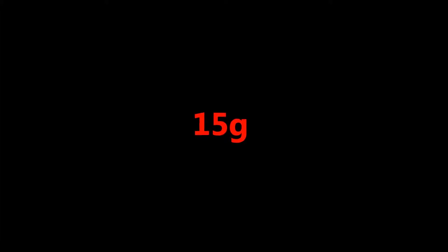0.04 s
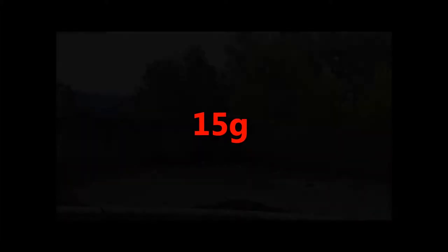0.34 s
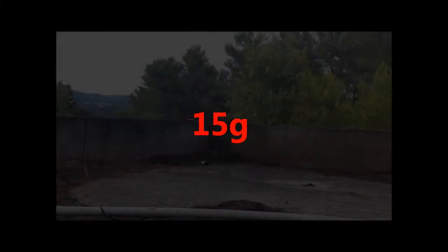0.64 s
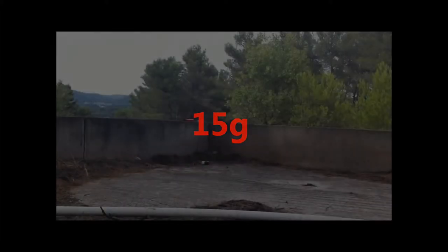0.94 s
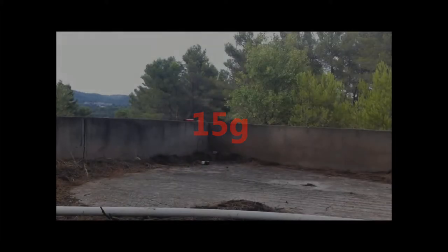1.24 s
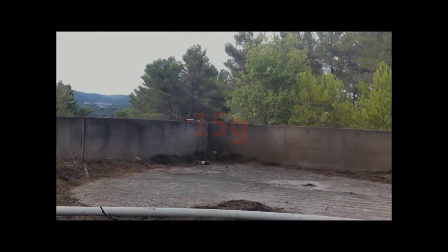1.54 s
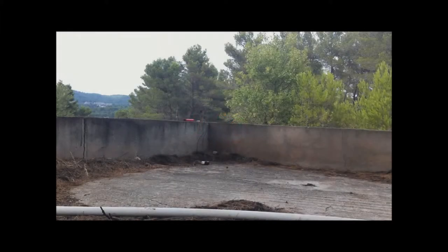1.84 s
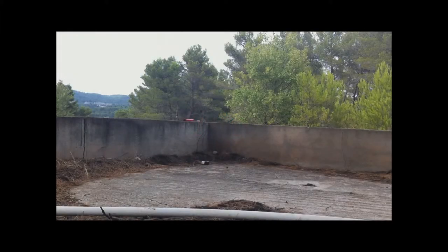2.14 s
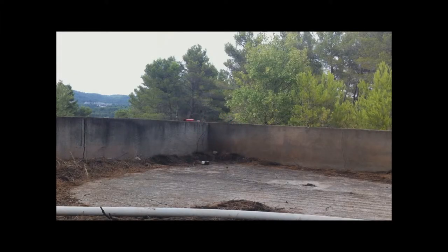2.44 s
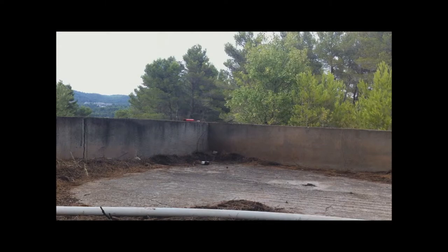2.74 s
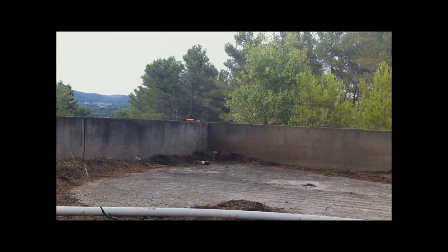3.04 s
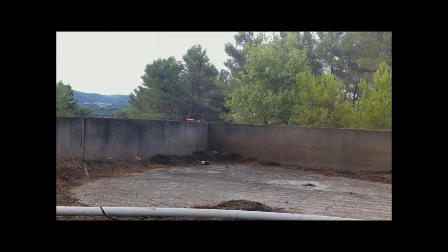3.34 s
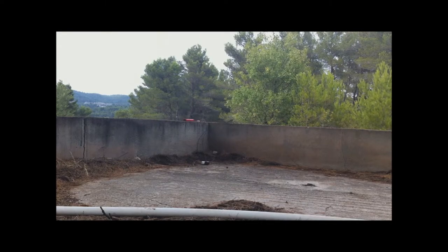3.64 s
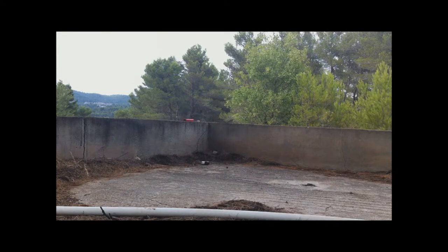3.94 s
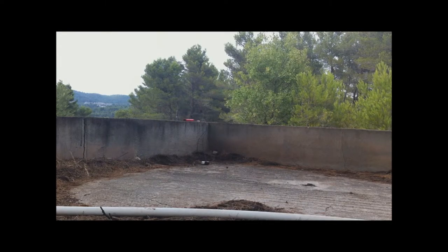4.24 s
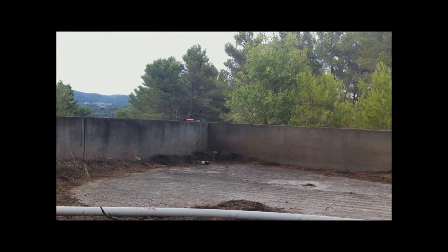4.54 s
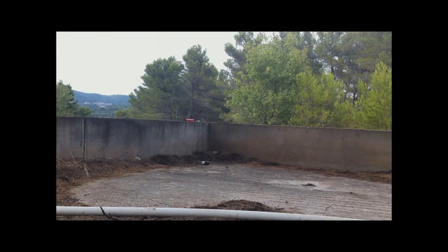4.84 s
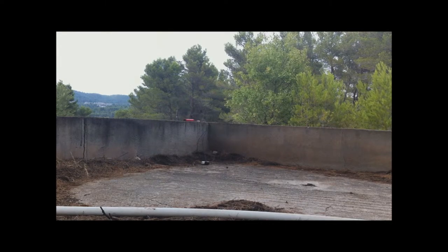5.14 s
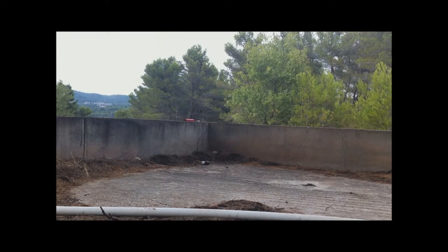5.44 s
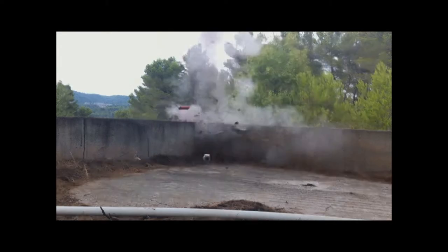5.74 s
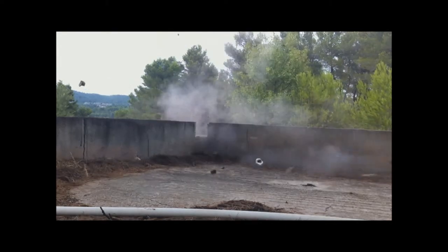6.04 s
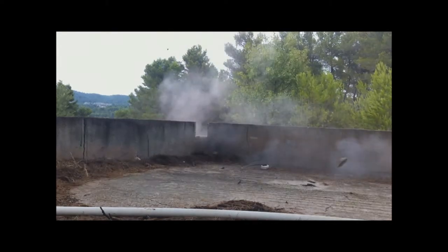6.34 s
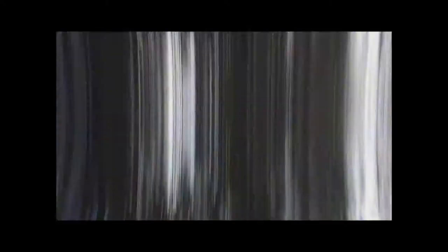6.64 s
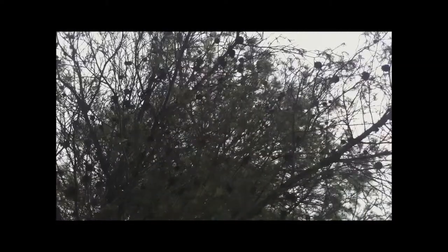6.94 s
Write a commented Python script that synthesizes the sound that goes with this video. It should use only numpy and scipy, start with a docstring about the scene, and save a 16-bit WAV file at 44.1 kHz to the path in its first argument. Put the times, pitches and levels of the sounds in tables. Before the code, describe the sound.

A loud black powder blast in a concrete pit cuts through steady cicadas, then fragments thud down nearby and grit patters.

```python
"""Cicadas sing in the pines round a concrete pit, their clicking tymbals ringing in their bodies.
A small canister of black powder bulges and bursts in the pit, and its shocks overload the microphone.
The walls throw back deep booms, then the roar dies away among the trees.
Flying debris cracks and thuds close by, and one hard fragment rings on the concrete.
Last, grit patters down and the camera is moved with a soft rustle."""
import sys
import numpy as np
from scipy import signal
from scipy.fft import rfft, irfft, next_fast_len
from scipy.io import wavfile

SR = 44100
rng = np.random.default_rng(int(sys.argv[2]) if len(sys.argv) > 2 else 0)


def inscribe(sig):
    """Save sig as 16-bit PCM at rate SR to the path in sys.argv[1].

    A 1-D sig is mono; a 2-D sig holds one channel per row.
    Samples are clipped to [-1, 1] before scaling.
    """
    pcm = np.round(np.clip(np.atleast_2d(sig).T, -1, 1) * 32767)
    wavfile.write(sys.argv[1], SR, pcm.astype(np.int16))


N = 308259

# The shock fronts. Each row: start in seconds, level in dB, decay time in seconds.
SHOCK_FRONTS = [(5.1873, -2, 0.0049), (5.191, 3.5, 0.00012), (5.2039, 0, 0.000077), (5.2375, -0.5, 0.0048),
                (5.2431, -15, .00005), (5.253, -17, 0.0001), (5.2736, -8.5, 0.00067), (5.3607, -1.5, .0002),
                (5.3637, -6, 0.00037), (5.3704, -2, 0.00023)]
# The body of the roar. Each row: frequency in Hz, relative level in dB.
ROAR_BODY = [(30, -36), (60, -28), (88, -24), (106, -6.5), (160, 0.5), (230, -2.5), (300, -6), (400, -5),
             (580, -4.5), (900, -8.5), (1250, -14.5), (1800, -47)]
# The hiss of the roar. Each row: frequency in Hz, relative level in dB.
ROAR_HISS = [(600, -25), (1000, -10), (1400, 0.5), (1900, -2), (2600, -4), (4000, -7), (6000, -9),
             (8000, -11.5), (10500, -13.5), (14500, -20.5), (16000, -36)]
# Low resonances that drone on. Each row: pitch in Hz, relative level in dB.
DRONE_TONES = [(108, -59), (157, -54.5), (203, -58), (239, -60)]
# Booms off the walls. Each row: centre in seconds, level in dB, pitch in Hz.
WALL_BOOMS = [(5.27, -12.5, 171), (5.284, -13, 161), (5.309, -9.5, 190), (5.3625, -12.5, 262)]
# Debris landing close by. Each row: start in seconds, thud level in dB, pitch in Hz,
# rise time in seconds, crack level in dB.
DEBRIS_HITS = [(5.912, -4, 560, 0.00096, 0), (5.9132, -14.5, 168, 0.0029, -28),
               (5.962, -39, 370, .012, -56), (6.1947, -17, 480, 0.0015, -29),
               (6.2057, -2, 1027, 0.001, 1.5), (6.2071, 2.5, 432, 0.0019, -11),
               (6.2706, -0.5, 545, 0.0011, -16.5), (6.2795, -0.5, 377, 0.001, -14.5),
               (6.293, -6, 570, 0.00089, -26), (6.311, -3.5, 360, 0.00096, -21.5),
               (6.3155, -18, 330, 0.005, -40), (6.329, -19.5, 284, 0.005, -42),
               (6.449, -46, 600, .002, -42), (6.626, -32, 241, 0.005, -43), (6.909, -45, 700, .002, -36)]
# The larger chips. Each row: start in seconds, level in dB, seconds to fall 60 dB.
CHIP_TICKS = [(5.481, -17, 0.014), (5.552, -25, .009), (5.733, -24, 0.016), (5.83, -27, .012),
              (5.9541, -19.5, 0.0042), (6.1463, -30, 0.0097), (6.1564, -28, .004), (6.245, -28, 0.0075),
              (6.3467, -21, 0.018), (6.489, -36, .06), (6.6415, -31, .008), (6.67, -33.5, .012)]
# The ring of a hard fragment. Each row: pitch in Hz, relative level in dB, seconds to fall 60 dB.
FRAGMENT_MODES = [(1760, -25, .036), (2360, -0.5, 0.038), (2450, -3.5, 0.026), (4160, -5, 0.046),
                  (6600, -9, 0.042), (7070, -5, 0.037), (9302, -6, 0.033), (10600, -17, .03)]
# The colour of sifting grit and handling. Each row: frequency in Hz, relative level in dB.
RUSTLE_COLOUR = [(80, -14), (300, 6.5), (700, -6), (1500, -1.5), (3500, -1), (6000, 1), (9500, -2.5),
                 (13000, -10), (16000, -14)]
# Soft handling scrapes. Each row: centre in seconds, rms level at the crest in dB,
# spread in seconds, band centre in Hz, bandwidth in Hz.
HANDLING_SCRAPES = [(6.581, -52, 0.015, 1600, 1500), (6.638, -47.5, 0.011, 980, 1090),
                    (6.68, -49.5, .018, 4000, 8000), (6.926, -41.5, 0.012, 9450, 6000),
                    (6.968, -48, 0.037, 5500, 5000), (6.982, -48.5, 0.019, 1140, 400)]
# A cicada's body resonances. Each row: centre in Hz, bandwidth in Hz, relative level in dB.
CICADA_RESONANCES = [(2350, 610, -2), (2970, 630, -2.5), (4900, 1400, 3), (7040, 1400, -5),
                     (8260, 1360, -0.5), (8930, 640, -4), (11900, 2600, -17.5)]
# The colour of the far cicadas together. Each row: frequency in Hz, relative level in dB.
CHORUS_COLOUR = [(200, -66), (1800, -24), (2300, -12), (3100, -14.5), (3700, -24.5), (4150, 0),
                 (4700, -0.5), (5500, -3), (6300, -8.5), (7500, -13.5), (9300, -20.5), (10200, -28),
                 (15500, -36.5)]
# The colour of open air. Each row: frequency in Hz, relative level in dB.
AIR_COLOUR = [(30, -42), (55, -30), (75, -14), (110, -1.5), (210, -1), (400, -3.5), (750, 1), (1100, -0.5),
              (1600, -6), (3500, -10.5), (12000, -35)]
# The bed chokes at the burst and the first thud. Each row: start in seconds, recovery in seconds.
BED_CHOKES = [(5.167, 0.067), (5.911, 0.04)]

OPEN_S, BLAST_S, ROAR_S = 0.2784, 5.1765, 5.259


def rupture(swing_hz=850, glide_s=0.00916, swing_db=-2, gas_db=-8, gas_peak_s=0.009):
    """The canister bulges with a growing, slowing swing, then tears and lets out a jet of gas."""
    t, out = moment(), np.zeros(N)
    pitch = swing_hz * np.exp(-t / glide_s)
    bulge = np.exp(-np.abs(t - .0052) / .0018)
    swing = bulge * np.sin(2 * np.pi * np.cumsum(pitch) / SR)
    jet = np.exp(np.minimum((t - gas_peak_s) / 0.0026, (gas_peak_s - t) / 0.002))
    gas = jet * rng.standard_normal(len(t))
    add(out, BLAST_S, from_db(swing_db) * swing + from_db(gas_db) * gas)
    return cut(out, 130, "high")


def shocks(mic_hz=165, mic_width_hz=135):
    """Each front is a jump in pressure that sinks back; the microphone's bass cut swings after it."""
    fronts = np.zeros(N)
    for s, db, decay_s in SHOCK_FRONTS:
        add(fronts, s, from_db(db) * np.exp(-moment() / decay_s))
    r = np.exp(-np.pi * mic_width_hz / SR)
    feedback = [1, -2 * r * np.cos(2 * np.pi * mic_hz / SR), r * r]
    swung = signal.lfilter([1, -2, 1], feedback, fronts + 1e-18)
    return cut(swung, 95, "high")


def roar(flicker_db=2.5):
    """Countless echoes from walls and trees: a dark body and a grainy hiss over a low drone."""
    body = noise(ROAR_BODY)
    body *= roar_envelope(pit_db=-23.5, flare_db=-24, tail_db=-23.5, fall_db_per_s=25, rest_db=-58.5)
    hiss = noise(ROAR_HISS, grain_db=3) * from_db(flicker_db * drift(120)) + grit()
    hiss *= roar_envelope(pit_db=-28.5, flare_db=-17, tail_db=-25.5, fall_db_per_s=28.5, rest_db=-70)
    hum = drone() * roar_envelope(pit_db=24, flare_db=15, tail_db=17.5, fall_db_per_s=16, rest_db=-1)
    return cut((body + hiss + hum) * fade_in(ROAR_S, 0.0015), 88, "high", order=4)


def roar_envelope(pit_db, flare_db, tail_db, fall_db_per_s, rest_db):
    """The roar holds in the pit, flares once and trails off in the trees; the parts add in power."""
    pit = from_db(pit_db) * (1 - fade_in(5.385, 0.034))
    flare = from_db(flare_db) * swell(5.368, 0.006)
    duck_db = -12.5 * fade_in(5.912, 0.085)   # the tail ducks from the first thud on
    tail = from_db(tail_db - fall_db_per_s * since(ROAR_S) + duck_db)
    return np.sqrt(pit ** 2 + flare ** 2 + tail ** 2 + from_db(rest_db) ** 2)


def drone(waver_hz=2.52, waver_db=0.5):
    """Low resonances hum on, each wavering in pitch and level."""
    out = np.zeros(N)
    for hz, db in DRONE_TONES:
        turns = np.cumsum(hz + waver_hz * drift(25)) / SR + rng.random()
        out += from_db(db + waver_db * drift(16)) * np.sqrt(2) * np.sin(2 * np.pi * turns)
    return out


def wall_echoes(spread_s=0.0038):
    """The walls throw the boom back in a few deep swells."""
    return sum(from_db(db) * np.sin(2 * np.pi * hz * (since(0) - s)) * swell(s, spread_s)
               for s, db, hz in WALL_BOOMS)


def thuds(bump_db=-14, bump_hz=155, bump_t60=0.034, shudder_db=-6, edge_db=-11):
    """Each lump lands with a sharp crack, a heavy swing or two, then a rough shudder over a deep bump."""
    t, out = moment(), np.zeros(N)
    bump = from_db(bump_db - 60 * t / bump_t60) * np.sin(2 * np.pi * bump_hz * t)
    for s, db, hz, rise_s, crack_db in DEBRIS_HITS + tumble():
        punch = t / rise_s * np.exp((1 - (t / rise_s) ** 2) / 2)
        thud = -np.sin(2 * np.pi * hz * t) * punch
        shudder = from_db(shudder_db) * cut(burst(t60=0.033), 800, "low")
        snap = burst(t60=0.0083)
        crack = 2 * resonate(snap, 2400, width_hz=2200) + from_db(edge_db) * snap
        add(out, s, from_db(db) * (thud + shudder + bump) + from_db(crack_db) * crack)
    return cut(out, 105, "high")


def tumble(from_s=6.224, loudest_s=6.281, to_s=6.302, per_s=120, faint_db=-26, loud_db=-15):
    """Debris tumbles between the hard hits: small, uneven knocks, as rows like those of DEBRIS_HITS."""
    rise_s, crack_db, spread_s, knock_hz = 0.0016, -15, 0.012, 430
    grid = np.arange(from_s, to_s, 1 / per_s)
    late, size, detune = rng.standard_normal((len(grid), 3)).T
    crest = np.exp(-((grid - loudest_s) / spread_s) ** 2 / 2)
    starts = grid + .2 * late / per_s
    levels = faint_db + (loud_db - faint_db) * crest + 1.5 * size
    pitches = knock_hz * np.exp(.2 * detune)
    return [(s, db, hz, rise_s, db + crack_db) for s, db, hz in zip(starts, levels, pitches)]


def chips(clink_s=6.1162, clink_db=-22.5, crack_db=3):
    """Chips land with dry ticks, and one hard fragment rings on the concrete."""
    t, out = moment(), np.zeros(N)
    for s, db, t60 in CHIP_TICKS:
        add(out, s, from_db(db) * burst(t60))
    ring = sum(from_db(db - 60 * t / t60) * np.sin(2 * np.pi * hz * t) for hz, db, t60 in FRAGMENT_MODES)
    crack = from_db(crack_db) * burst(t60=0.032)
    add(out, clink_s, from_db(clink_db) * (ring + crack))
    return cut(cut(out, 900, "high"), 11000, "low", order=1)


def grit(per_s=70, level_db=-2, spread_db=5, t60=0.0045):
    """Sand and splinters crackle down at random, each grain a tiny puff of bright noise."""
    sizes = from_db(spread_db * np.minimum(rng.exponential(1, N), 3))
    hits = (rng.random(N) < per_s / SR) * sizes
    decays = signal.lfilter([1], [1, -from_db(-60 / (t60 * SR))], hits + 1e-18)
    crackle = cut(decays * rng.standard_normal(N), 1500, "high")
    return from_db(level_db) * crackle * fade_in(ROAR_S, 0.4)


def rustle(start_s=6.0, start_db=-59, rise_db_per_s=9, flicker_db=2, sand_db=-4):
    """Fine grit sifts down while the camera is picked up with a growing rustle and a few scrapes."""
    growth = from_db(start_db + rise_db_per_s * since(start_s)) * fade_in(start_s, .3)
    handling = noise(RUSTLE_COLOUR, grain_db=3.5) * from_db(flicker_db * drift(70))
    out = growth * (handling + from_db(sand_db) * grit())
    for s, db, spread_s, hz, width_hz in HANDLING_SCRAPES:
        scrape = rms_one(resonate(rng.standard_normal(N), hz, width_hz))
        out += from_db(db) * swell(s, spread_s) * scrape
    return out


def near_cicada(tymbal_hz=84.6, song_db=-50, rest_db=-12, vary_db=0.8, second_tymbal_db=-3):
    """Two tymbals buckle in turn; their click bursts ring in the body, phrase after phrase."""
    singing = phrasing(per_s=4.92, peak_s=0.078, edge=3.7, unsteady_s=0.0034)
    effort = (singing + from_db(rest_db) * (1 - singing)) * from_db(vary_db * drift(3.99))
    strokes = np.cumsum(2 * tymbal_hz * (1 + .02 * drift(15))) / SR
    clicks = np.exp(-3.6 * (strokes % 1)) * from_db(second_tymbal_db * (np.floor(strokes) % 2))
    drive = clicks + 0.28   # the trees smear the clicks
    song = np.zeros(N)
    for hz, width_hz, db in CICADA_RESONANCES:
        rasp = drive * rng.standard_normal(N)
        song += from_db(db) * resonate(resonate(rasp, hz, width_hz), hz, width_hz)
    return from_db(song_db) * effort * rms_one(song)


def far_cicadas(chorus_db=-50.3, phrase_db=4, vary_db=0.6, flutter_db=0.5):
    """A chorus in the pines; one slower singer stands out, in and out of step with the near cicada."""
    singing = phrasing(per_s=4.29, peak_s=0.2, edge=1.1, unsteady_s=.004)
    chorus = noise(CHORUS_COLOUR)
    level_db = chorus_db + phrase_db * singing + vary_db * drift(14) + flutter_db * drift(160)
    return chorus * from_db(level_db)


def phrasing(per_s, peak_s, edge, unsteady_s):
    """An insect's beat, 1 in a phrase and 0 at rest; a high edge makes it square."""
    beat = np.cos(2 * np.pi * per_s * (since(0) - peak_s + unsteady_s * drift(3)))
    return (1 + np.tanh(edge * beat) / np.tanh(edge)) / 2


def countryside(air_db=-61, far_hush_db=-9, near_hush_db=-16):
    """Cicadas over still air; they sit lower in the mix after the bang."""
    after = fade_in(BLAST_S, .02)
    far = far_cicadas() * from_db(far_hush_db * after)
    near = near_cicada() * from_db(near_hush_db * after)
    return far + near + from_db(air_db) * noise(AIR_COLOUR)


def choke(depth_db=-43, attack_s=0.0046, linger=1.4):
    """A gain that drops fast at each choke, lingers and climbs back."""
    dip = sum(fade_in(s, attack_s) * (1 - fade_in(s, recovery_s) ** linger)
              for s, recovery_s in BED_CHOKES)
    return from_db(depth_db * dip)


def from_db(db):
    """Decibels to gain."""
    return 10 ** (np.asarray(db) / 20)


def rms_one(x):
    """Scale to unit power."""
    return x / np.sqrt(np.mean(x ** 2) + 1e-20)


def since(s):
    """Seconds since s, zero before it."""
    return np.maximum(np.arange(N) / SR - s, 0)


def moment():
    """Time axis of a short event."""
    return np.arange(SR // 8) / SR


def fade_in(s, length_s):
    """A straight rise from 0 to 1."""
    return np.minimum(since(s) / length_s, 1)


def swell(s, spread_s):
    """A bell-shaped rise and fall round time s."""
    return np.exp(-((since(0) - s) / spread_s) ** 2 / 2)


def drift(per_s):
    """A random wander, gliding to a new value per_s times a second."""
    knots = rng.standard_normal(4000)
    return np.interp(since(0) * per_s, np.arange(len(knots)), knots)


def noise(colour, grain_db=0):
    """Noise of a given colour, rms 1; uneven sample sizes make it grainy."""
    hz, db = np.transpose(colour)
    size = next_fast_len(N)
    white = rng.standard_normal(size) * from_db(grain_db * np.minimum(rng.exponential(1, size), 7))
    bins_hz = np.maximum(np.arange(size // 2 + 1) * SR / size, 1)
    eq = from_db(np.interp(np.log(bins_hz), np.log(hz), db))
    return rms_one(irfft(rfft(white) * eq, size)[:N])


def burst(t60):
    """A puff of noise that falls 60 dB in t60 seconds."""
    t = moment()
    return rng.standard_normal(len(t)) * from_db(-60 * t / t60)


def cut(x, hz, kind, order=2):
    """Butterworth filter; kind names the side that passes."""
    sections = signal.butter(order, np.minimum(hz, .45 * SR), kind, fs=SR, output="sos")
    return signal.sosfilt(sections, x + 1e-18)


def resonate(x, hz, width_hz):
    """One resonance, gain 1 at its top."""
    r = np.exp(-np.pi * width_hz / SR)
    feedback = [1, -2 * r * np.cos(2 * np.pi * hz / SR), r * r]
    return signal.lfilter(np.array([1, 0, -1]) * (1 - r * r) / 2, feedback, x + 1e-18)


def add(out, s, sound):
    """Mix a short sound in at time s."""
    at = round(s * SR)
    out[at:at + len(sound)] += sound[:max(N - at, 0)]


def scene():
    """The mono mix: blast and debris on top of a bed of countryside, roar and rustle."""
    bed = (countryside() + roar() + rustle()) * choke() * fade_in(OPEN_S, 0.016)
    return (bed + rupture() + shocks() + wall_echoes() + thuds() + chips())[None]


def record(dry):
    """The peaks overload the microphone, and the very top is cut away."""
    clipped = np.clip(dry, -.97, .97)
    return signal.sosfilt(signal.cheby2(14, 55, 16800, fs=SR, output="sos"), clipped)


dry = scene()
out = record(dry)
inscribe(out)
```